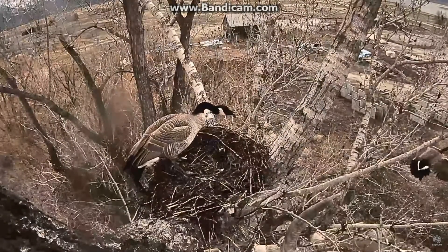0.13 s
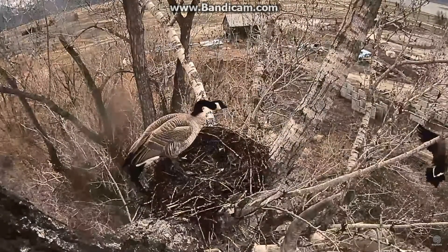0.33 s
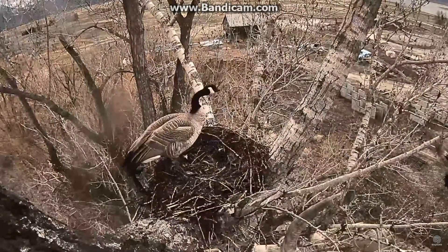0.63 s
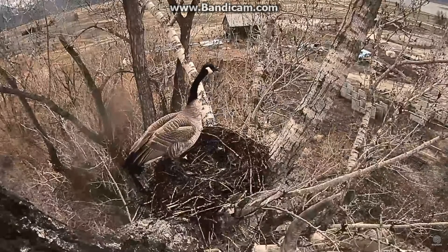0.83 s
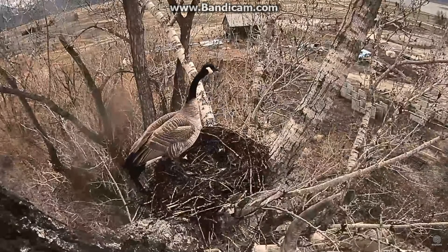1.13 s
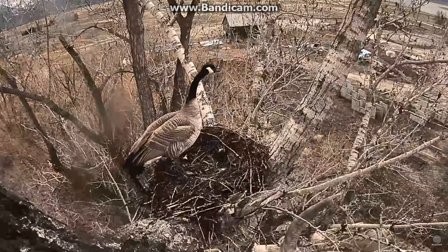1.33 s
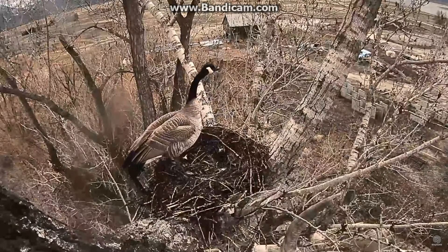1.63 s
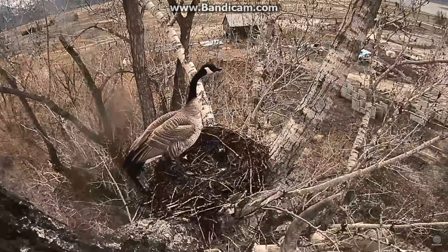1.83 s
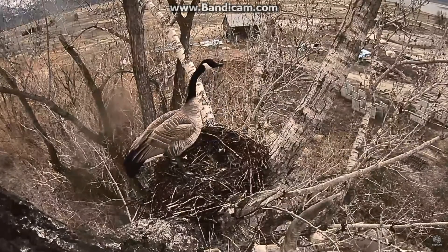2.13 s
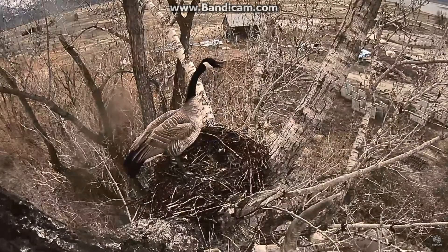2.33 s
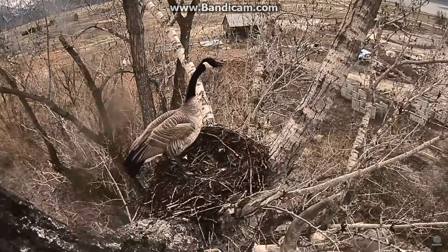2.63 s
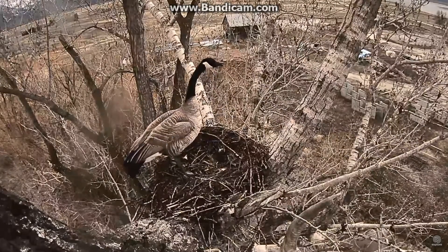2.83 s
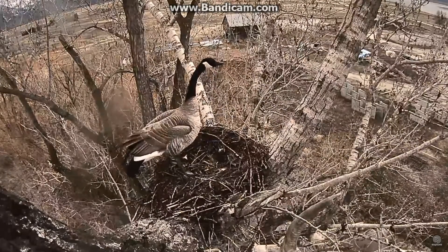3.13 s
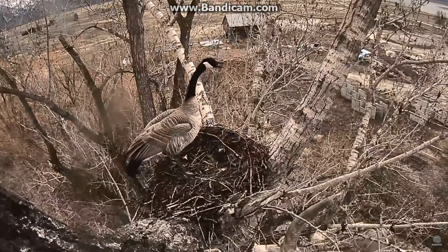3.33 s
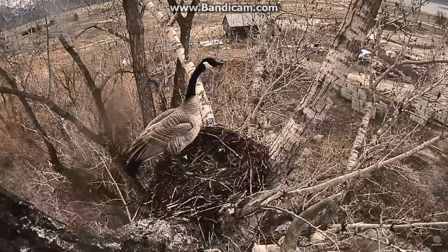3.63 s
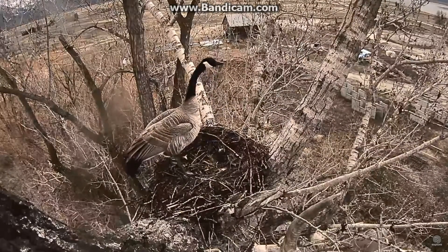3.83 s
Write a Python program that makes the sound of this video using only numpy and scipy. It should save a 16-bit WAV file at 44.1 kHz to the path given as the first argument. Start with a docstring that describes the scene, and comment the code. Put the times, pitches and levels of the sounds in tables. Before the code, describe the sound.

Near goose grunts once, then honks three times, each sagging in pitch at the end, with light echo among bare trees; a far goose answers very faintly while wind buffets the small microphone.

```python
"""A goose on its nest honks four times close to a small outdoor microphone: throat pulses make a growl,
and the last three honks break into a clear tone, a stack of sines, that sags in pitch.
Trunks and sheds echo it as delayed copies and a dying tail; a far goose answers, hoarse and then clear.
Shaped noise makes the wind buffeting the microphone and the rustle of the bare trees' twigs;
short noise bursts make the twig ticks and the trills of something small."""
import sys
import numpy as np
from scipy import signal
from scipy.io import wavfile
from scipy.ndimage import uniform_filter1d

SR = 44100
rng = np.random.default_rng(int(sys.argv[2]) if len(sys.argv) > 2 else 0)


def decibels_to_gain(level_db):
    """Convert a level in decibels to a linear amplitude gain (20 dB per decade)."""
    exponent = np.asarray(level_db, float) / 20
    return 10 ** exponent


def bounce(signal):
    """Save signal as a 16-bit WAV file at the path given by the first command-line argument."""
    frames = np.transpose(np.atleast_2d(signal))
    limited = np.clip(frames, -1, 1)
    pcm = np.round(limited * 32767).astype(np.int16)
    wavfile.write(sys.argv[1], SR, pcm)


N = 176400  # samples, 4 s


def evened(x):
    """Scale a signal to an rms of 1."""
    return x / np.sqrt(np.mean(x ** 2) + 1e-20)


def read(points, hz):
    """Read a curve of (frequency, value) points along a logarithmic frequency scale."""
    f, value = np.transpose(points)
    return np.interp(np.log(hz + 1), np.log(f + 1), value)


def columns(rows):
    """Start time and each column of a curve, sample by sample."""
    rows = np.array(rows)
    t = np.arange(rows[0, 0], rows[-1, 0], 1 / SR)
    return rows[0, 0], [np.interp(t, rows[:, 0], c) for c in rows.T[1:]]


def fade(n, rise_s, fall_s):
    """Straight fade in and out."""
    t = np.arange(n) / SR
    return np.minimum(np.minimum(t / rise_s, t[::-1] / fall_s), 1)


def add(mix, start_s, sound):
    """Lay a sound into the mix, cut off at the end of the mix."""
    part = mix[round(start_s * SR):][:len(sound)]
    part += sound[:len(part)]


def band(x, order, low_hz, high_hz):
    """Keep what lies between two frequencies."""
    return signal.lfilter(*signal.butter(order, [low_hz, high_hz], "band", fs=SR), x)


def resonate(x, hz, width_hz):
    """Two-pole resonance of gain 1."""
    return signal.lfilter(*signal.iirpeak(hz, hz / width_hz, SR), x)


def drifting(n, span):
    """Slow random drift: noise averaged over a span of samples, with an rms of 1."""
    return evened(uniform_filter1d(rng.standard_normal(n), span))


def noise(size, colour, level_db, lift, patchy_db, span):
    """Random short-time spectra under a colour, a level and drifting patches."""
    hop = size // 4
    hz = np.fft.rfftfreq(size, 1 / SR)
    frames = N // hop + 5
    real, imaginary, patches = rng.standard_normal((frames, len(hz), 3)).T
    # Neighbouring frequencies and frames share a patch.
    patches = evened(uniform_filter1d(uniform_filter1d(patches, span, 0), 5, 1))
    level = level_db[np.clip(np.arange(frames) * hop, 0, N - 1)]
    # lift gives the extra dB at each frequency for each dB of level above the average
    field_db = read(colour, hz)[:, None] + patchy_db * patches
    field_db = field_db + lift(hz)[:, None] * (level - level.mean())
    spectra = (real + 1j * imaginary) * decibels_to_gain(field_db)
    sound = signal.istft(spectra, nperseg=size, noverlap=size - hop)[1][:N]
    return decibels_to_gain(level_db) * evened(sound)


def wind():
    """Lumpy bass buffeting on the microphone that reaches higher in the gusts."""
    # wind spectrum: hz, density (dB per Hz)
    wind_colour = [(20, -56.5), (50, 8.5), (108, -2.5), (204, -19), (700, -37.5), (4000, -100)]
    # gusts: middle_s, level_db
    gusts = [(.63, -29.5), (0.974, -32), (1.18, -26), (1.325, -22), (1.441, -26), (1.643, -23),
             (1.809, -26.5), (2.129, -24), (2.297, -24), (2.687, -19)]
    steady_db, gust_s = -33, 0.088
    t = np.arange(N) / SR
    power = decibels_to_gain(2 * steady_db)
    for middle_s, db in gusts:
        power = power + decibels_to_gain(2 * db) * np.exp(-(2 * (t - middle_s) / gust_s) ** 4)
    # Above 170 Hz each dB of wind brings 0.27 dB more than in the bass.
    lift = lambda hz: 0.27 * (hz > 170)
    return noise(2048, wind_colour, 10 * np.log10(power), lift, patchy_db=2.0, span=3)


def twigs():
    """Dry rustle of leaves and twigs as patchy noise, and single ticks as fast-dying noise bursts."""
    # rustle loudness: time_s, level_db
    rustle = [(0, -43.5), (.4, -45.5), (.8, -39), (1.001, -48.5), (4, -49.5)]
    # rustle spectrum: hz, density (dB per Hz)
    rustle_colour = [(300, -23.5), (1400, -3.5), (3000, -0.5), (4200, -10), (7000, -31), (16000, -46.5)]
    # twig ticks: start_s, peak_db
    ticks = [(0.3016, -27), (0.4855, -18), (.868, -25), (0.8936, -22), (1.072, -27)]
    tick_hz, tick_t60_s = 2900, .008
    level_db = np.interp(np.arange(N) / SR, *np.transpose(rustle))
    out = noise(512, rustle_colour, level_db, np.zeros_like, patchy_db=1.8, span=6)
    t = np.arange(400) / SR
    for start_s, peak_db in ticks:
        burst = decibels_to_gain(-60 * t / tick_t60_s) * rng.standard_normal(len(t))
        snap = band(burst, 3, tick_hz / np.sqrt(2), tick_hz * np.sqrt(2))  # one octave
        add(out, start_s, decibels_to_gain(peak_db) * snap / abs(snap).max())
    return out


def small_animals():
    """Dry trills, perhaps a small frog: uneven clicks of filtered noise that swell and fade."""
    # trills: start_s, length_s
    trills = [(0.124, 0.16), (1.065, 0.14), (1.702, 0.15), (2.032, 0.13), (2.58, 0.24), (3.006, 0.15),
              (3.622, 0.18)]
    clicks_per_s, level_db = 78, -47
    out = np.zeros(N)
    for start_s, length_s in trills:
        t = np.arange(0, length_s, 1 / SR)
        air, size = rng.standard_normal((2, len(t)))
        turns = np.cumsum(clicks_per_s * (1 + .08 * drifting(len(t), 600))) / SR
        click_size = decibels_to_gain(2 * size[turns.astype(int)])  # one random size for each click
        clicks = air * np.exp(-(turns % 1) / .1) * click_size
        trill = evened(band(clicks, 4, 2300, 4500))
        add(out, start_s, decibels_to_gain(level_db) * fade(len(t), 0.038, 0.079) * trill)
    return out


def throat(drive, resonances):
    """Each throat resonance, two filters in a row, rings side by side with alternating sign."""
    total = 0
    for k, (hz, width_hz, db) in enumerate(resonances):
        ringing = resonate(resonate(drive, hz, 2 * width_hz), hz, 2 * width_hz)
        total = total + (-1) ** k * decibels_to_gain(db) * evened(ringing)
    return evened(total)


def growl(rows, throb, beak_hz):
    """Pulses with a puff of air each ring the throat; roughness unsettles their timing and size."""
    # the single throat resonance near 1 kHz: hz, width_hz, level_db
    one_khz_throat = (1002, 89, 0)
    # the pair of throat resonances either side of it, 663 and 1310 Hz: hz, width_hz, level_db
    pair_throat = [(663, 138, -4.5), (1310, 116, 1)]
    # upper throat resonances: hz, width_hz, level_db
    upper_throat = [(1827, 350, -8), (2580, 120, -7.5), (3358, 377, -5), (4990, 1100, -15.5)]
    jitter, rasp, uneven_db = .15, 1.6, 6  # at full roughness
    smear_s = 0.0077  # time in which the windpipe echoes fall by 20 dB
    start_s, (hz, level_db, one_khz_db, upper_db, rough) = columns(rows)
    n = len(hz)
    rough = np.clip(rough, 0, 1)
    air, size = rng.standard_normal((2, n))

    turns = np.cumsum(hz * (1 + jitter * rough * drifting(n, 200))) / SR
    count = np.floor(turns)
    every, weaker_db = throb
    pulse_db = uneven_db * rough * size + weaker_db * (count % every == 0)
    pulses = np.diff(count, prepend=-1) * decibels_to_gain(pulse_db)
    puffs = evened(np.exp(-(turns % 1) / 0.42) * air)
    drive = evened(pulses / np.sqrt(hz)) + rasp * rough * puffs
    # Each pulse also lets off a short burst of bright noise.
    bursts = air * signal.lfilter([1], [1, -.985], pulses ** 2)
    snaps = evened(signal.lfilter(*signal.butter(2, 5500, "high", fs=SR), bursts))

    # Echoes in the long windpipe spread each pulse.
    t = np.arange(800) / SR
    windpipe = size[:len(t)] * np.sqrt(t) * decibels_to_gain(-20 * t / smear_s)
    drive = signal.fftconvolve(drive, windpipe)[:n]

    one_khz, upper = decibels_to_gain(one_khz_db), decibels_to_gain(upper_db)
    pair = np.sqrt(np.clip(1 - one_khz ** 2 - upper ** 2, .05, 1))  # the remaining power, at least 0.05
    sound = one_khz * throat(drive, [one_khz_throat]) + pair * throat(drive, pair_throat)
    sound = sound + upper * throat(drive, [(beak_hz, 130, 0)] + upper_throat)
    sound = band(sound, 3, 450, 5500) + decibels_to_gain(-30) * np.sqrt(upper) * snaps
    return start_s, sound * decibels_to_gain(level_db) * fade(n, 0.0083, 0.016)


def near_goose():
    """Four growls of the near goose, the last three breaking into clear tones."""
    # growls, a curve for each honk: time_s, pulses_per_s, level_db, one_khz_resonance_db,
    # upper_resonances_db, roughness (0-1)
    growls = [
        [(.552, 165, -20.5, -10, -7.5, 0.39), (.575, 175, -11, -1, -6, 0.01),
         (.63, 172, -14.5, -2.5, -10.5, 0.24), (.655, 164, -14.5, -5.5, -5, 0.56),
         (.675, 171, -9.5, -44.5, -3, 0), (.752, 161, -22, 4, -4.5, 0.13)],
        [(1.243, 165, -20, -11, -3, 0.41), (1.29, 176, -14, -5, -10, 0.29), (1.365, 147, -7, -10.5, 2.5, 0.49)],
        [(2.238, 123, -12, -50.5, -2.5, 0.19), (2.325, 168, -12.5, 1, -4.5, .2),
         (2.36, 207, -8.5, -29.5, 0.5, 0.73)],
        [(3.193, 132, -14, -12.5, -3, 0.48), (3.255, 204, -14, -3, -7.5, 0.18),
         (3.298, 224, -5.5, -32, 3, 0.52)],
    ]
    # for each growl, one pulse in so many is weaker: count (pulses), change_db
    throbs = [(1, 0), (2, -3), (3, -6), (2, -5)]
    # for each growl, the strongest upper resonance: pitch_hz
    beaks = [2368, 2066, 2040, 2032]
    # clear tones, a curve for each: time_s, pitch_hz, third_partial_db, second_partial_db, sixth_partial_db
    tones = [
        [(1.34, 719, -34, -32.5, -48), (1.364, 693, -7, -11, -21), (1.404, 682.4, -8, -19.5, -29.5),
         (1.425, 661.4, -26.5, -15, -33), (1.47, 603, -29, -19, -48.5)],
        [(2.338, 696, -19.5, -18, -21), (2.355, 695.5, -5.5, -9.5, -20), (2.41, 695.3, -8.5, -24, -19.5),
         (2.445, 692.3, -7.5, -29.5, -19), (2.482, 661.2, -9.5, -20, -26.5), (2.515, 640, -28, -17.5, -107.5)],
        [(3.272, 677.6, -13.5, -7, -26), (3.3, 689, -9, -18, -21), (3.362, 689.5, -6.5, -31.5, -19),
         (3.398, 659.7, -10, -18, -26), (3.44, 626, -33, -18.5, -97.5)],
    ]
    out = np.zeros(N)
    for rows, throb, beak_hz in zip(growls, throbs, beaks):
        add(out, *growl(rows, throb, beak_hz))
    for rows in tones:
        add(out, *tone(rows))
    return out


def woods(x):
    """Trunks and sheds: a few single echoes and a scattered tail that dies band by band."""
    # dying away of the tail: hz, t60_s (time to fall by 60 dB)
    echo = [(700, 0.95), (2100, 1.2), (4000, 1.33), (8000, 0.028)]
    # single echoes: delay_s, level_db
    walls = [(.135, -31), (.235, -42)]
    tail_db, tail_start_s = -27, .03
    taps = np.zeros(SR)
    at = np.arange(round(tail_start_s * SR), SR - 20, 20)
    taps[at + rng.integers(0, 20, len(at))] = rng.choice([-1., 1.], len(at))
    hz, t, spectra = signal.stft(taps, SR, nperseg=256)
    dying = decibels_to_gain(-60 * t / read(echo, hz)[:, None])
    tail = signal.istft(spectra * dying, SR, nperseg=256)[1]
    tail = decibels_to_gain(tail_db) * tail / np.linalg.norm(tail)
    for delay_s, db in walls:
        tail[round(delay_s * SR)] += decibels_to_gain(db)
    echoes = signal.fftconvolve(x, tail)[:N]
    return signal.lfilter(*signal.butter(2, 4500, fs=SR), echoes)  # duller than the direct sound


def tone(rows):
    """A steady fold vibration as a stack of partials; the higher ones fade more as effort drops."""
    # partials 4-19 against their guiding level: level_db
    upper_db = [-2.5, -5.5, -1, -8.5, -4, -2, -8, -9.5, -6, -10.5, -11.5, -17, -65, -31, -12, -15]
    first_db = -25.5  # the weak first partial, where the tone is loudest
    waver, flutter_db = .003, 3.5  # share of the pitch, swelling of each upper partial
    start_s, (hz, third_db, second_db, sixth_db) = columns(rows)
    n = len(hz)
    phase = 2 * np.pi * np.cumsum(hz * (1 + waver * drifting(n, 300))) / SR
    loud_db = np.maximum(third_db, second_db)
    sound = decibels_to_gain(first_db + 0.4 * (loud_db - loud_db.max())) * np.sin(phase)
    sound += decibels_to_gain(second_db) * np.cos(2 * phase)
    sound += decibels_to_gain(third_db) * np.sin(3 * phase)
    for k, db in enumerate(upper_db, 4):
        # Partials 4 and 5 follow the louder of the second and third, the others follow the sixth.
        if k < 6:
            lead_db = loud_db - 12.0
        else:
            lead_db = sixth_db + 0.17 * (k - 6) * (sixth_db + 18)
        flutter = flutter_db * drifting(n, 500)  # each swells and dips on its own
        sound += decibels_to_gain(db + lead_db + flutter) * np.sin(k * phase + 2 * np.pi * rng.random())
    return start_s, np.sqrt(2) * sound * fade(n, 0.0047, 0.021)


def far_call(start_s, length_s, level_db):
    """A short hoarse growl that climbs and breaks into an unsteady tone."""
    # the first five partials: level_db before the level of the call
    partials_db = [4.4, 12.8, 12, 0.5, 8.2]
    tone_hz = 787
    t = np.arange(0, length_s, 1 / SR)
    clear = np.clip((t - .03) / 0.0092, 0, 1)  # 0 is hoarse, 1 is clear
    hz = tone_hz * (1 - .15 * (1 - clear) + .02 * drifting(len(t), 200))
    phase = 2 * np.pi * np.cumsum(hz) / SR
    air = rng.standard_normal(len(t))
    rasp = evened(resonate(air * (1 + np.cos(phase / 4)), 1110, 240))
    voice = sum(decibels_to_gain(db) * np.sin(k * phase) for k, db in enumerate(partials_db, 1))
    sound = clear * voice + 4 * (1 - clear) * rasp
    return start_s, decibels_to_gain(level_db) * fade(len(t), 0.021, 0.035) * sound


def far_goose():
    """The answers of the far goose."""
    # far calls: start_s, length_s, level_db
    calls = [(1.637, 0.081, -58), (1.973, 0.15, -55.5), (2.937, 0.093, -56.5), (3.874, 0.11, -56.5)]
    out = np.zeros(N)
    for call in calls:
        add(out, *far_call(*call))
    return out


def scene():
    """Add up both geese, their echoes, wind, twigs and trills, the same in both channels."""
    goose, far = near_goose(), far_goose()
    echoes = woods(goose + 2 * far)  # the far goose reaches the woods at double strength
    mix = goose + far + echoes + wind() + twigs() + small_animals()
    return np.tile(mix, (2, 1))


def band_limit(x):
    """A steep low-pass at the top of the band."""
    return signal.sosfilt(signal.butter(12, 16340, fs=SR, output="sos"), x)


def record(dry):
    """The small microphone's amplifier rounds off the loudest peaks."""
    knee = .85  # the highest level it can reach
    rounded = dry / (1 + abs(dry / knee) ** 6) ** (1 / 6)
    return band_limit(rounded)


dry = scene()
out = record(dry)
bounce(out)
```